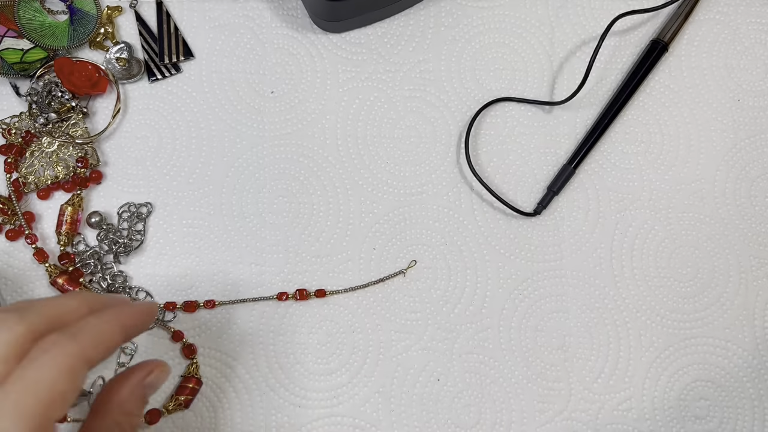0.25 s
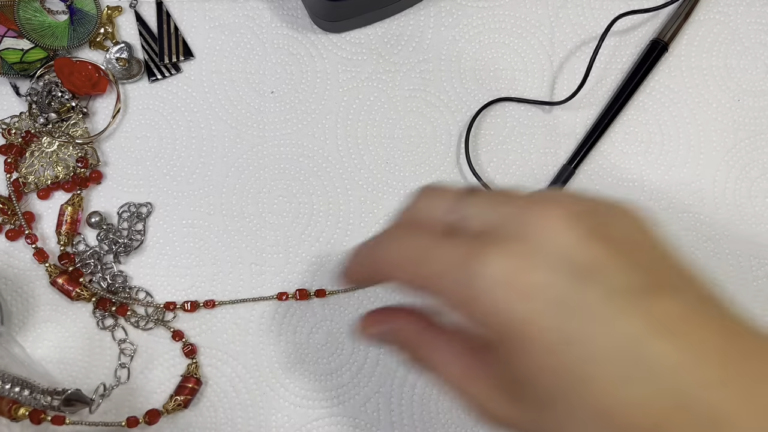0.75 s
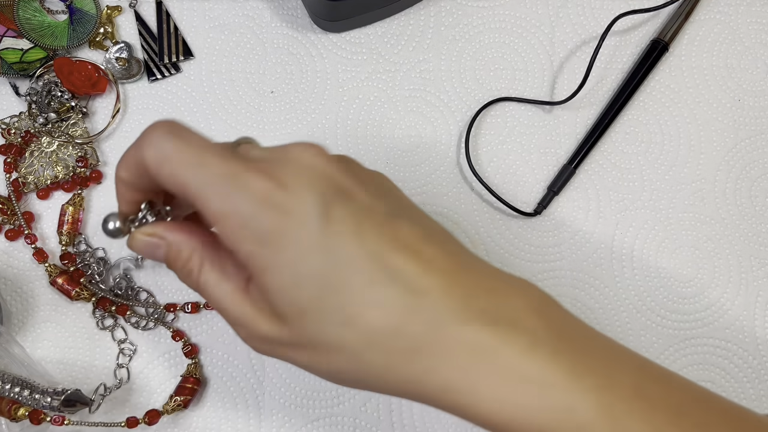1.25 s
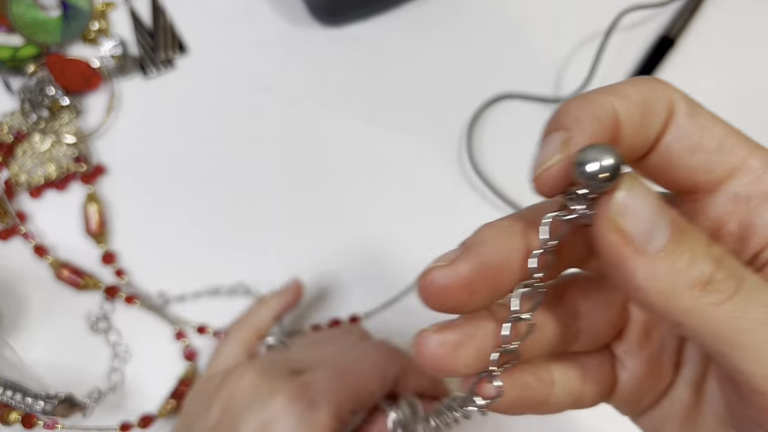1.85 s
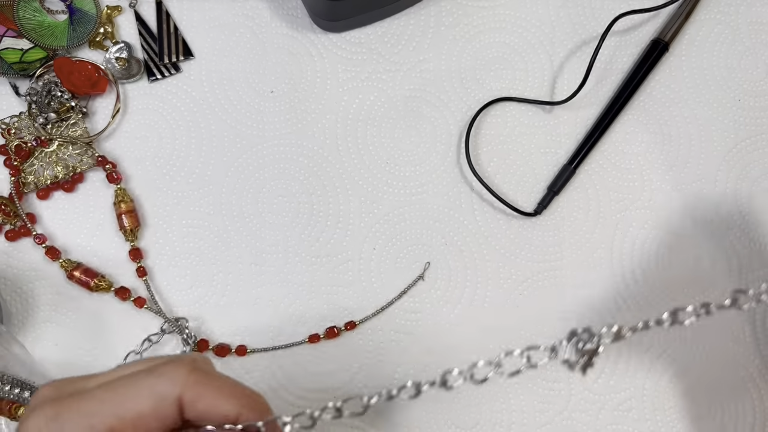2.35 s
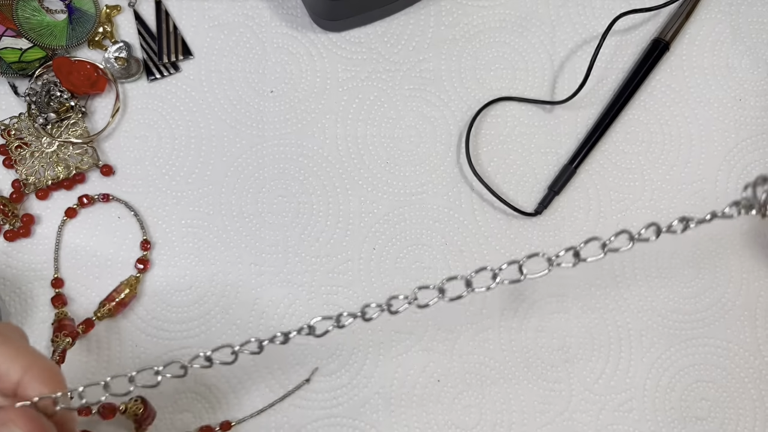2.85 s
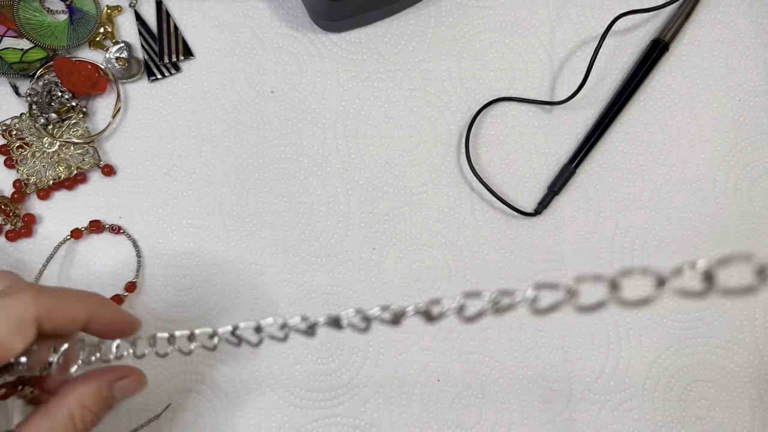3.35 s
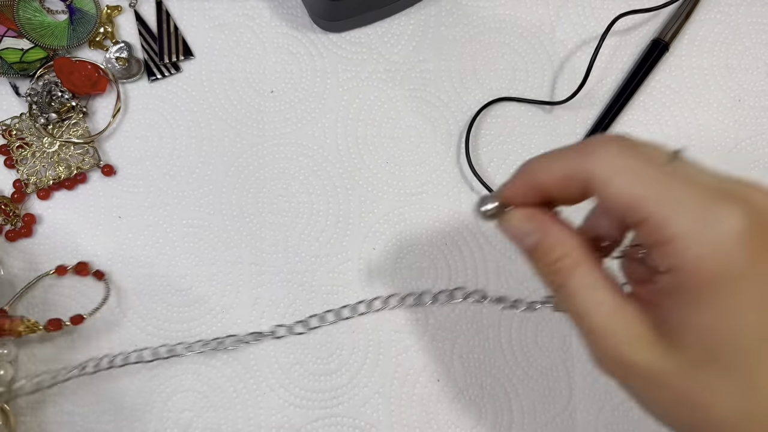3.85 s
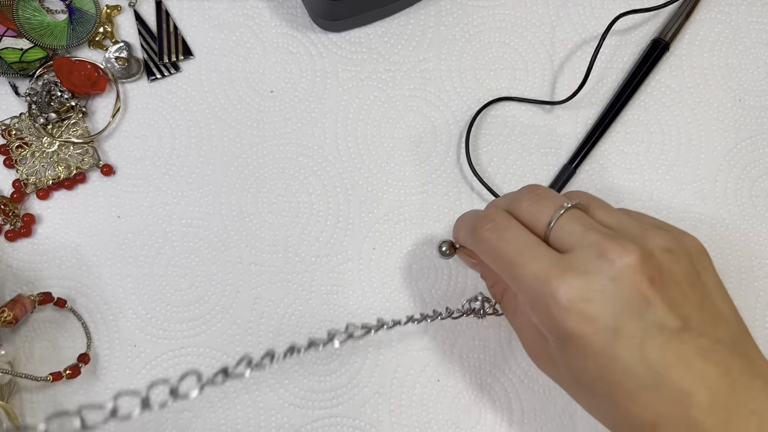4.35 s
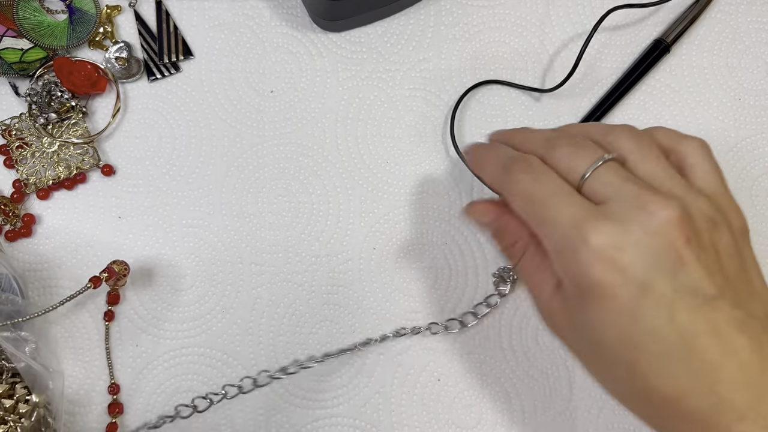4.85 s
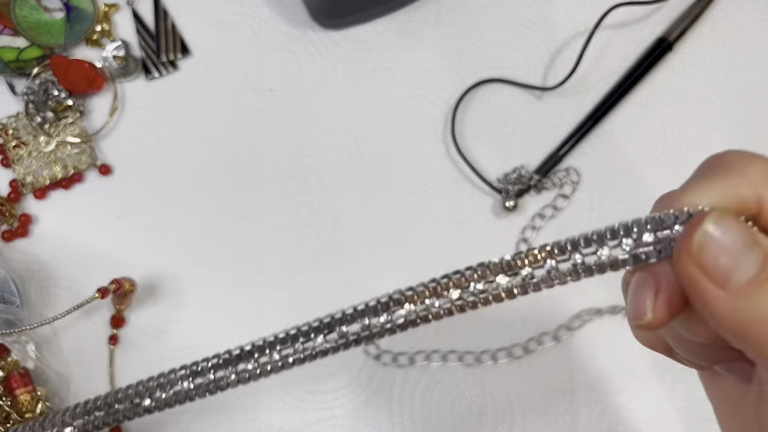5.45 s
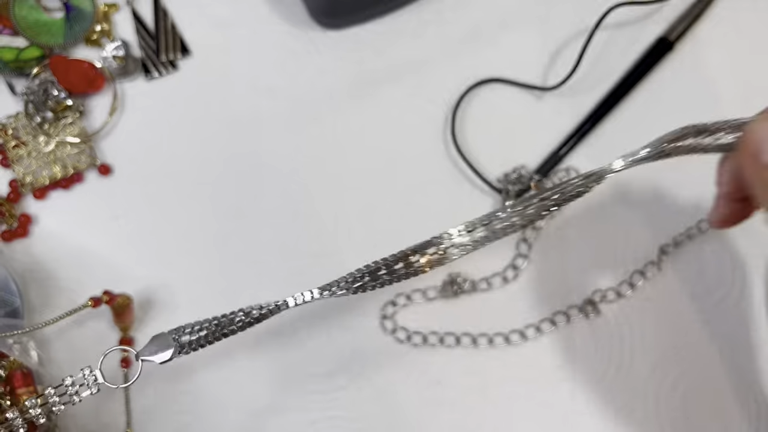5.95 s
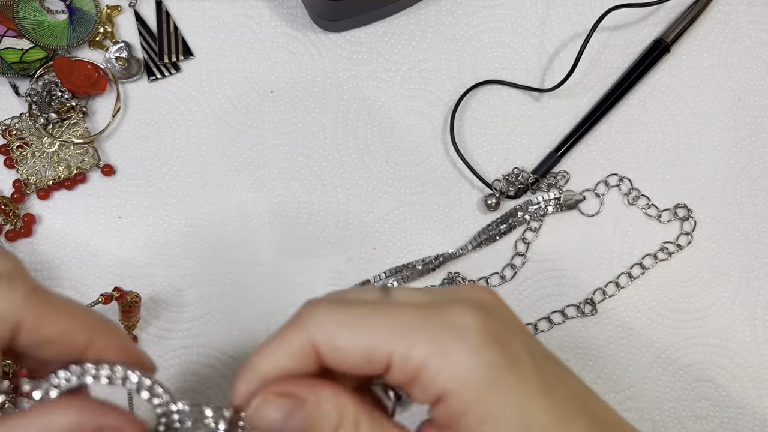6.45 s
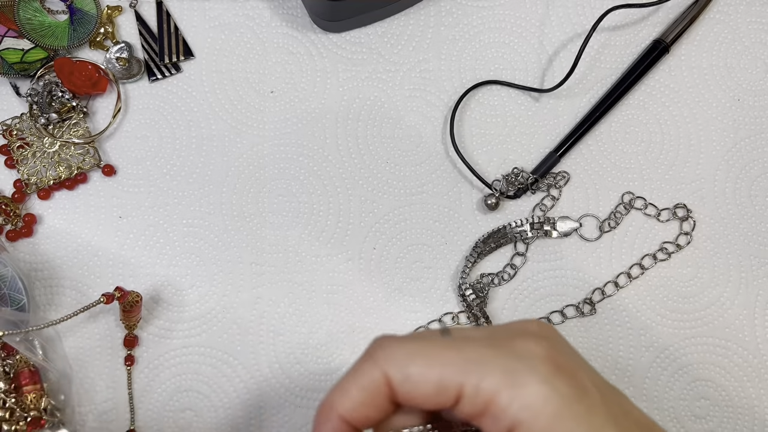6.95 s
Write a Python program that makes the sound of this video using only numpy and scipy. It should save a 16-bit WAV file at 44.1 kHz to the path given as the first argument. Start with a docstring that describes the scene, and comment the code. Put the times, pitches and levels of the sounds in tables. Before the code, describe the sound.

On a table covered with paper towel, hands stir jewelry chains with a sharp clatter and knocks, and a bead rolls off briefly. Faint bright link ticks follow, then chain drags and drops in busy scraping rattles. A flat chain slides, lands ringing, and a few links tinkle. Close stereo microphones above, quiet low room hum.

```python
"""On a table covered with paper towel, hands stir metal chains in a heap of jewellery and a bead rolls out.
Links tick lightly, then chain is dragged and dropped over the paper; at last a flat chain lands ringing
and a few links tinkle. Soft finger thumps fall early and late. Random contacts shake table, paper and links,
each heard as filtered noise and short resonances; small solid parts ring as beating tones.
Quiet room hum lies under it all; two close microphone ports hear it from above."""
import sys
import numpy as np
from scipy import signal
from scipy.fft import rfft, irfft, next_fast_len
from scipy.io import wavfile
from scipy.ndimage import uniform_filter1d

SR = 44100
rng = np.random.default_rng(int(sys.argv[2]) if len(sys.argv) > 2 else 0)


def unload_wav(signal):
    """Save mono or channel-first audio to the path in sys.argv[1] as 16-bit WAV at rate SR, clipped to [-1, 1]."""
    wavfile.write(
        sys.argv[1],
        SR,
        np.round(np.clip(np.atleast_2d(signal).T, -1, 1) * 32767).astype(np.int16),
    )


N = 317961

MESH_S = 6.27  # seconds: the flat chain lands


def chain():
    """Two streams of random contacts shake three bodies: table top, paper and links."""
    table, paper, links = motion()
    hits = contacts(per_s=900, spread_db=3.6, clump_db=2.2, clump_s=0.025)
    ticks = contacts(per_s=870, spread_db=3.5, clump_db=-0.5, clump_s=0.018)
    _, paper_db, table_db, links_db = strikes()
    return (table_top(table, hits, table_db) + table_rumble(table, paper)
            + paper_towel(paper, hits, ticks, paper_db)
            + loose_links(links, hits, ticks, links_db) + flat_chain(links, ticks, links_db))


# Colour of the knocked table top. Each row: frequency in Hz, relative level in dB.
TABLE_COLOUR = [(70, -16.5), (200, -9), (450, -3.5), (900, -6.5), (1500, -7), (2500, -13), (4500, -35)]
# Resonances of the table top. Each row: frequency in Hz, width in Hz, peak gain in dB.
# The rolling bead sounds them too, with widths and gains of its own in the low ones.
TABLE_MODES = [(496, 45, -14.5), (610, 12, -5.5), (860, 98, -2), (1080, 180, -9), (2380, 150, -5)]


def table_top(table, hits, blow_db):
    """Contacts knock the table: coloured noise, its modes, and duller clacks; blows die slowest here."""
    steady_and_rattle = table * (0.05 + 0.34 * fade(hits, t60=0.007))
    knock = shake(steady_and_rattle + blows(blow_db, rise_s=0.0016, t60=0.089, crack_db=-8.0))
    knock = colour(knock, TABLE_COLOUR)
    clack_power = table * hits + blows(blow_db - 13, rise_s=0.0005, t60=0.04, crack_db=0)
    clacks = amp(-4) * clinks(clack_power, low_hz=350, high_hz=2700, sharpness=12, count=10)
    return knock + ring(knock, TABLE_MODES) + clacks


# Low rumble of the whole table. Each row: frequency in Hz, relative level in dB.
RUMBLE_COLOUR = [(25, -32), (60, -1), (110, 1.5), (220, -5), (500, -26.5)]


def table_rumble(table, paper):
    """The sliding load shakes the whole table: low noise that follows the smoothed motion."""
    load = uniform_filter1d(table ** 0.69 * paper ** 0.17, 2000)  # width in samples
    return amp(-8.5) * colour(shake(load), RUMBLE_COLOUR)


# Colour of the scraped paper towel. Each row: frequency in Hz, relative level in dB.
PAPER_COLOUR = [(600, -30.5), (1500, -7), (2500, -5.5), (4000, -1), (5500, -4), (7000, -9), (10000, -19.5)]


def paper_towel(paper, hits, ticks, blow_db):
    """Chain scrapes the paper as coloured noise, and beads clink on it with short resonances."""
    rub_and_rattle = paper * (0.33 + 0.19 * fade(hits, t60=0.0091))
    scrape = shake(rub_and_rattle + blows(blow_db, rise_s=0.0004, t60=0.033, crack_db=1.7))
    bead_power = paper * ticks + blows(blow_db - 12, rise_s=.0003, t60=.02, crack_db=0)
    beads = amp(-2.5) * clinks(bead_power, low_hz=1300, high_hz=9000, sharpness=15, count=20)
    return colour(scrape, PAPER_COLOUR) + beads


# Bright colour of the links. Each row: frequency in Hz, relative level in dB.
LINKS_COLOUR = [(3000, -34), (6000, -8), (8500, -4), (10500, -5), (12000, 5.5), (15500, 2), (16500, -8.5)]


def loose_links(links, hits, ticks, blow_db):
    """Links strike each other: bright noise bursts, plus loops with sharp high resonances."""
    rattle = 0.29 + 0.23 * fade(hits, t60=0.0066) + 1.2 * fade(ticks, t60=0.014)
    tinkle = shake(links * rattle + blows(blow_db, rise_s=0.00013, t60=0.028, crack_db=8))
    loops = amp(-4) * clinks(links * ticks, low_hz=11500, high_hz=15300, sharpness=70, count=8)
    flat_chain_down = np.arange(N) / SR > MESH_S
    # fizzes less once the flat chain has landed
    return (colour(tinkle, LINKS_COLOUR) + loops) * amp(-2. * flat_chain_down)


# Resonances of the flat chain. Each row: frequency in Hz, width in Hz, gain in dB per pass.
MESH_MODES = [(8950, 420, 7.5), (9600, 380, 6), (12400, 450, 4.5), (15600, 600, 6)]


def flat_chain(links, ticks, blow_db):
    """From its landing on, the flat chain's contacts ring a few narrow, high modes."""
    landed = np.arange(N) / SR > MESH_S
    rattle = 0.42 * links * fade(ticks, t60=.004)
    push = landed * shake(rattle + blows(blow_db, rise_s=0.00034, t60=0.059, crack_db=0))
    return ring(ring(push, MESH_MODES), MESH_MODES)  # two passes: steep skirts


# Tugs of the hand that set chain moving. Each row: start in seconds, strongest moment in seconds,
# end in seconds, then power level in dB at the strongest moment for table, paper and links.
TUGS = [(.132, .15, .255, -60, -40, -38), (.265, .29, .335, -60, -50, -44), (.34, .44, .48, -46, -48, -66),
        (.47, .53, .58, -43.5, -44, -45), (.57, .70, .745, -51, -48, -61),
        (1.11, 1.155, 1.2, -54, -48, -49), (1.2, 1.22, 1.5, -90, -85, -68),
        (1.55, 1.8, 1.87, -84, -82, -65), (1.9, 2.0, 2.1, -88, -86, -71), (2.1, 2.16, 2.37, -88, -84, -66),
        (2.42, 2.62, 2.75, -85, -81, -70), (2.75, 2.77, 2.98, -62, -61, -62),
        (3.0, 3.12, 3.16, -70, -67, -71), (3.16, 3.175, 3.24, -58, -57, -66),
        (3.25, 3.3, 3.45, -52, -54, -59), (3.45, 3.57, 3.74, -46.5, -49, -62),
        (3.775, 3.89, 3.95, -50, -54, -62), (3.92, 4.07, 4.24, -40.5, -36, -45),
        (4.19, 4.35, 4.54, -43, -38, -42), (4.46, 4.6, 4.7, -39, -31, -39),
        (4.62, 4.68, 4.82, -38, -38, -37), (4.83, 4.86, 4.93, -52, -52, -52),
        (4.92, 4.975, 5.0, -42, -45, -61), (5.02, 5.2, 5.32, -62, -63, -59),
        (5.355, 5.45, 5.52, -49.5, -45, -53), (5.533, 5.56, 5.6, -52, -47, -52),
        (5.6, 5.64, 5.7, -62, -58, -62), (5.718, 5.74, 5.8, -70, -56, -51),
        (5.81, 5.82, 6.02, -58, -60, -68), (6.0, 6.24, 6.27, -72, -77, -72),
        (6.272, 6.295, 6.312, -39, -44, -43), (6.33, 6.39, 6.48, -80, -66, -53),
        (6.605, 6.635, 6.705, -104, -100, -62), (6.725, 6.765, 6.92, -104, -100, -63)]
# For table, paper, links: dB relative to the strongest moment, at the start and the end of a tug.
START_DB, ENDS_DB = [-6.5, -14.5, -12.5], [-11.5, -13, -14.5]
ONSET_DB_PER_S, SETTLE_DB_PER_S = 3505.5, [503, 449.5, 219]  # loose links settle last
REST_DB = -98  # chain lying still


def motion():
    """Power given to table, paper and links: each tug starts at once, swells, sags and settles."""
    t = np.arange(0, N, 32) / SR  # one point every 32 samples
    power = amp(2 * REST_DB)
    for start, top, end, *top_db in TUGS:
        before = (top - t) / max(top - start, 1e-3)
        after = (t - top) / max(end - top, 1e-3)
        off = np.clip(np.where(t < top, before, after), 0, 1)  # 0 at the strongest moment, 1 at the edges
        sag_db = np.where(t < top, np.c_[START_DB], np.c_[ENDS_DB]) * off
        onset_db = ONSET_DB_PER_S * np.maximum(start - t, 0)
        settle_db = np.c_[SETTLE_DB_PER_S] * np.maximum(t - end, 0)
        power = power + amp(2 * (np.c_[top_db] + sag_db - onset_db - settle_db))
    return [np.interp(np.arange(N) / SR, t, p) for p in power]


# Links, beads and clasps striking the covered table.
# Each row: time in seconds, drive in dB of paper, of table and of links.
BLOWS = [(0.134, -57, -61.5, -29), (0.3356, -24.5, -18, -41), (0.388, -34, -20.5, -66),
         (0.504, -39, -29.5, -56), (0.5892, -44, -29, -67), (0.647, -62, -54, -70), (0.703, -64, -46, -66),
         (2.898, -40, -45, -48.5), (3.209, -48.5, -48.5, -55), (3.25, -39.5, -57, -50),
         (3.5211, -29, -40, -62), (3.5725, -36, -54, -37.5), (3.739, -45.5, -60, -59),
         (3.8236, -49, -42, -49), (3.876, -60, -41, -58), (3.9612, -56, -47, -61),
         (4.0225, -29, -38.5, -28.5), (4.1834, -34, -38.5, -40), (4.264, -31, -37.5, -52),
         (4.2934, -27, -34.5, -25.5), (4.4474, -33, -45, -54), (4.5875, -26.5, -28, -47),
         (4.6883, -15.5, -37, -19), (4.8378, -33.5, -35.5, -36.5), (4.9363, -59, -41.5, -49),
         (4.961, -58, -57, -63), (5.0691, -49.5, -47.5, -71), (5.1591, -50, -54.5, -47),
         (5.532, -37.5, -41.5, -42), (5.551, -29, -48, -50), (5.831, -35.5, -41.5, -34),
         (5.883, -32, -50.5, -43), (5.9281, -37.5, -65, -70), (6.036, -39.5, -61, -67.5),
         (6.1612, -46.5, -54, -69), (6.2725, -30.5, -36.5, -32)]
# Light, bright ticks of links, with no table knock. Each row: time in seconds, drive in dB of the links.
LINK_TICKS = [(1.362, -59.5), (1.419, -64.5), (1.478, -58), (1.534, -54), (1.617, -44), (1.765, -55.5),
              (1.793, -48.5), (2.0194, -52), (2.037, -56), (2.226, -60.5), (2.3323, -53.5), (2.56, -62.5),
              (3.073, -58), (5.607, -40), (5.613, -46.5), (6.383, -40), (6.41, -58), (6.429, -49),
              (6.468, -48), (6.629, -53), (6.784, -64.5), (6.836, -55.5), (6.882, -55)]
TICK_BODY_DB = -25  # the duller part of a tick, relative to its links


def strikes():
    """All single contacts as columns s, paper dB, table dB, links dB; link ticks have no table knock."""
    light = [(s, db + TICK_BODY_DB, -np.inf, db) for s, db in LINK_TICKS]
    return np.transpose(list(BLOWS) + light)


def blows(level_db, rise_s, t60, crack_db):
    """Power envelope of the single contacts: a crack, then a rattling decay."""
    hits, t = np.zeros(N), np.arange(SR // 4) / SR
    hits[np.round(strikes()[0] * SR).astype(int)] = amp(2 * level_db)
    rattle = 10 ** (-6 * t / t60)
    crack = amp(2 * crack_db) * np.exp(-t / 0.00019)
    shape = (rattle + crack) * (1 - np.exp(-t / rise_s))
    return abs(signal.oaconvolve(hits, shape)[:N])


def contacts(per_s, spread_db, clump_db, clump_s):
    """Power of random link contacts, mostly small, arriving in clumps; mean 1."""
    size_db = spread_db * np.minimum(rng.exponential(1, N), 4)
    span = int(clump_s * SR)
    slow_noise = uniform_filter1d(uniform_filter1d(rng.standard_normal(N), span), span)
    happens = rng.random(N) < per_s / SR
    power = amp(2 * (size_db + clump_db * evened(slow_noise))) * happens
    return power / power.mean()


def clinks(power, low_hz, high_hz, sharpness, count):
    """Every contact rings one small part out of many, each with its own short resonance."""
    held = SR // 300  # samples for which one part keeps rattling
    part = np.repeat(rng.integers(0, count, N // held + 1), held)[:N]
    pitch = np.geomspace(low_hz, high_hz, count) * rng.uniform(0.79, 1.044, count)
    push = shake(power)
    out = np.zeros((2, N))
    for k, hz in enumerate(pitch):
        loudness = np.sqrt(SR * sharpness / hz / np.pi)  # narrow bands pass less noise
        out += loudness * ring(push * (part == k), [(hz, hz / sharpness, 0)])
    return out


ROLL_START_S, ROLL_END_S, ROLL_DB, ROLL_FADE_DB = .70, 0.9, -53, -11.5
BUMP_START_S, BUMP_GAP_S, BUMP_DB = .765, 0.024, -36


def roll():
    """A bead rolls over the table: a fading rub in its low modes, even bumps also in its highest one."""
    t = np.arange(N) / SR
    done = (t - ROLL_START_S) / (ROLL_END_S - ROLL_START_S)
    level = amp(ROLL_FADE_DB * np.clip(done, 0, 1)) * (done > 0) * (done < 1)
    bumps = (t > BUMP_START_S) * np.exp(-((t - BUMP_START_S) % BUMP_GAP_S) / 0.0026)
    low = [(hz, 2 * width, -5 * np.log10(width)) for hz, width, _ in TABLE_MODES[:3]]
    high = TABLE_MODES[-1:]
    rub = evened(ring(ring(shake(np.ones(N)), low), low)) * level * (0.45 + bumps)
    return amp(ROLL_DB) * rub + amp(BUMP_DB) * ring(shake(bumps) * level, high)


# Small solid parts left ringing.
# Each row: start in seconds, frequency in Hz, level in dB of the main tone, 60 dB decay time in seconds.
RINGING_PARTS = [(1.165, 14400, -57, .45), (4.499, 14200, -34, .03), (4.690, 5480, -20, .045),
                 (4.690, 3550, -17, .035), (4.704, 5480, -32, .04)]


def rings():
    """Close pairs of dying tones that beat against each other."""
    out, t = np.zeros((2, N)), np.arange(SR // 2) / SR
    for (s, hz, db, t60), turn in zip(RINGING_PARTS, rng.random((len(RINGING_PARTS), 2, 1))):
        main = np.sin(2 * np.pi * (hz * t + turn))
        partner = .6 * np.sin(2 * np.pi * hz * 1.006 * t)
        envelope = amp(db - 60 * t / t60) * (1 - np.exp(-t / .001))
        out[:, round(s * SR):][:, :len(t)] += envelope * (main + partner)
    return out


# Soft finger thumps on the table. Each row: start in seconds, level in dB, centre frequency in Hz.
FINGER_THUMPS = [(0.17, -55.5, 600), (1.085, -50.5, 330), (6.286, -43, 396), (6.78, -61.5, 153.6)]


def thumps():
    """Soft finger thumps, low and without a crack: a slow swell of noise in one broad resonance."""
    out, t = np.zeros((2, N)), np.arange(SR // 10) / SR
    swell = np.e * t / 0.012 * np.exp(-t / 0.012)  # reaches 1 after 12 ms
    for (s, db, hz), noise in zip(FINGER_THUMPS, rng.standard_normal((len(FINGER_THUMPS), 2, len(t)))):
        mode = [(hz, hz, 0)]
        body = evened(ring(ring(noise, mode), mode))
        out[:, round(s * SR):][:, :len(t)] += amp(db) * body * swell
    return out


def echoes(x, t60):
    """Short diffuse return from table and walls, duller than the direct sound."""
    t = np.arange(SR // 3) / SR
    signs = rng.choice([-1., 1.], (2, len(t)))
    sparse = rng.random((2, len(t))) < .05
    tail = signs * sparse * amp(-60 * t / t60) * (t > .004)
    tail = signal.lfilter([.4], [1, -.6], tail)
    return signal.fftconvolve(x, tail / np.linalg.norm(tail[0]), axes=1)[:, :N]


# Spectrum of the quiet room. Each row: frequency in Hz, relative density in dB.
ROOM_SPECTRUM = [(20, -34), (40, -11), (58, -1.5), (110, -18), (200, -24), (400, -35.5), (1500, -42),
                 (9500, -48), (13000, -55)]
ROOM_DB = -66.5  # overall level


def room_tone():
    """Steady low hum of the room with a faint hiss: noise shaped in frequency."""
    gain = amp(read(ROOM_SPECTRUM, np.fft.rfftfreq(N, 1 / SR)))
    spectrum = rfft(rng.standard_normal((2, N))) * gain
    return amp(ROOM_DB) * evened(irfft(spectrum, N))


def amp(db):
    """Amplitude factor of a level in dB."""
    return 10 ** (np.asarray(db) / 20)


def evened(x):
    """Scale to an RMS of 1."""
    return x / np.sqrt(np.mean(x ** 2) + 1e-20)


def read(points, hz):
    """Read a curve of (Hz, value) points along a log frequency axis."""
    f, value = np.transpose(points)
    return np.interp(np.log(hz + 1), np.log(f + 1), value)


def colour(x, points):
    """Causal filter of unit noise gain from a spectrum: minimum phase keeps attacks sharp."""
    log_gain = np.log(amp(read(points, abs(np.fft.fftfreq(4096, 1 / SR)))))
    taps = np.fft.ifft(np.exp(np.conj(signal.hilbert(log_gain)))).real[:2048]
    return signal.oaconvolve(x, taps[None] / np.linalg.norm(taps), axes=1)[:, :N]


def ring(x, modes):
    """Sum of two-pole resonances, each with its stated gain at the peak."""
    return sum(amp(db) * signal.lfilter(*signal.iirpeak(hz, hz / width, SR), x) for hz, width, db in modes)


def fade(power, t60):
    """Each contact's power dies away by 60 dB in t60 seconds; total power is kept."""
    r = 10 ** (-6 / (t60 * SR))
    return signal.lfilter([1 - r], [1, -r], power)


def shake(power):
    """Noise under a power envelope, drawn apart for the two ports."""
    return np.sqrt(power) * rng.standard_normal((2, N))


def scene():
    """Everything close on the table, its echoes, and the room behind."""
    near = chain() + roll() + rings() + thumps()
    return near + amp(-12.0) * echoes(near, t60=.12) + room_tone()


# Likeness of the two microphone ports. Each row: frequency in Hz, share in common from 0 to 1.
PORT_LIKENESS = [(60, .96), (250, .85), (1000, .45), (9700, .35), (10700, .96), (15000, .9), (16000, .65)]
# Phase lead of what the right port shares with the left. Each row: frequency in Hz, lead in radians.
RIGHT_LEAD = [(300, 0), (1000, 2.2), (3000, 1.4), (9500, 2.4), (10700, 3.15), (13260, 6.2), (16000, 8.7)]
# Balance of the ports. Each row: frequency in Hz, left over right in dB.
PORT_TILT = [(60, 4), (150, -0.5), (380, 1.5), (950, 4.5), (2380, 1), (5980, 7), (15000, -3)]
EDGE_HZ = 16000  # upper band limit


def record(dry):
    """Two close ports share bass and top treble, the right leading in phase; then the band limit."""
    size = next_fast_len(N + 4096)
    hz = np.fft.rfftfreq(size, 1 / SR)
    shared, apart = rfft(dry, size)
    alike = np.clip(read(PORT_LIKENESS, hz), 0, 1)
    tilt = amp(read(PORT_TILT, hz) / 2)  # half up on the left, half down on the right
    lead = np.exp(1j * read(RIGHT_LEAD, hz))
    right = alike * lead * shared + np.sqrt(1 - alike ** 2) * apart
    ports = irfft(np.array([shared * tilt, right / tilt]), size)[:, :N]
    low_pass = signal.firwin(511, EDGE_HZ, window=("kaiser", 9), fs=SR)
    return signal.oaconvolve(ports, low_pass[None], "same")


dry = scene()
out = record(dry)
unload_wav(out)
```